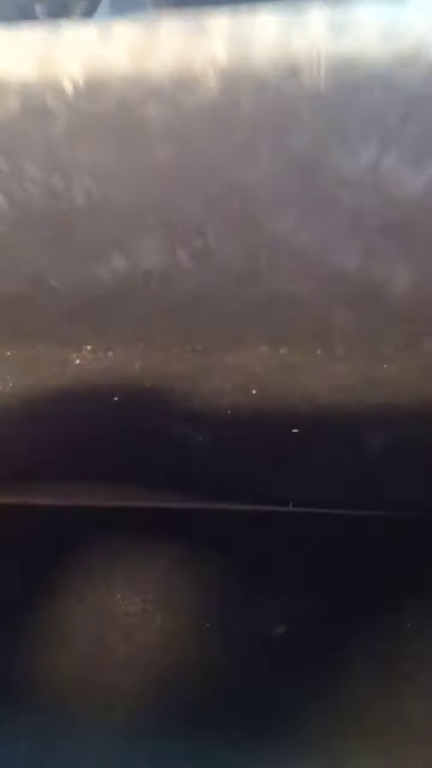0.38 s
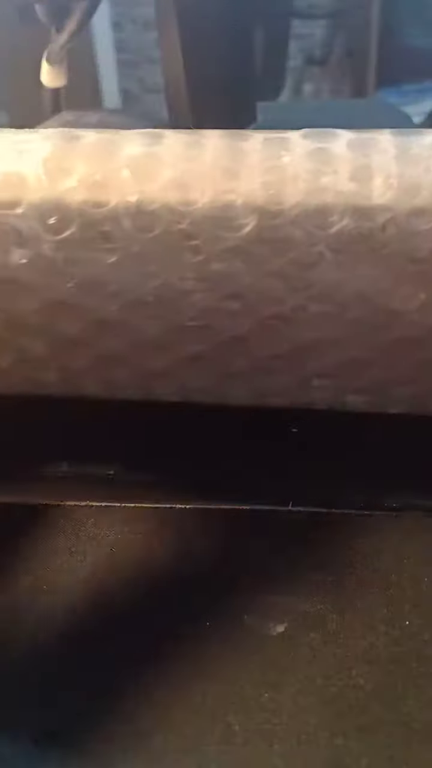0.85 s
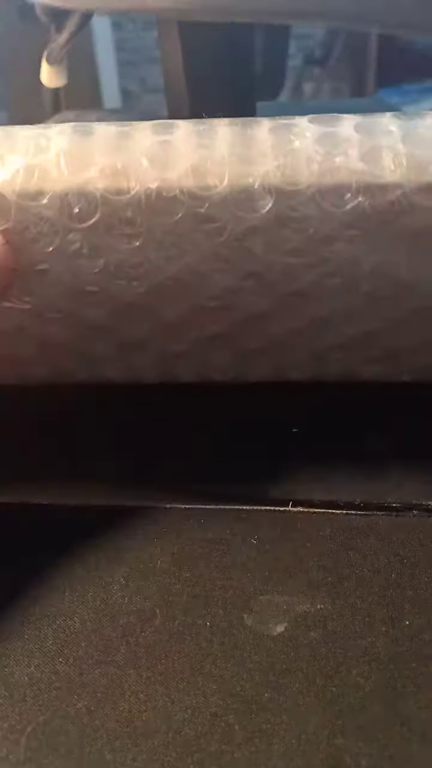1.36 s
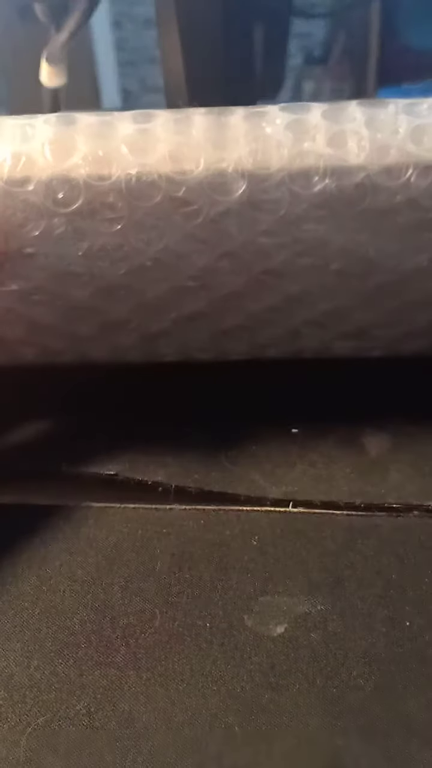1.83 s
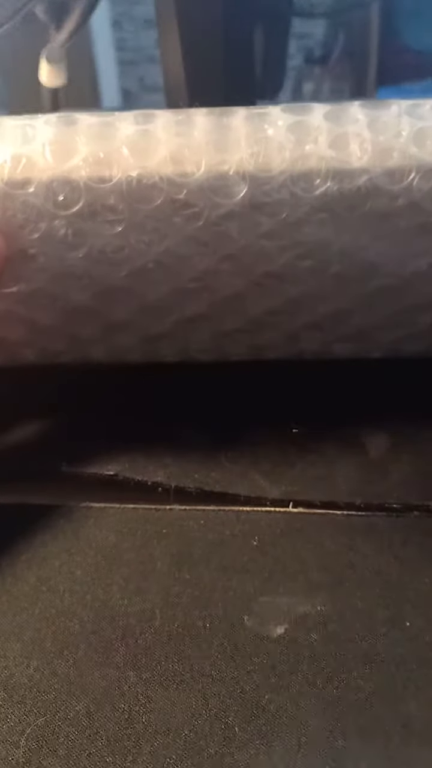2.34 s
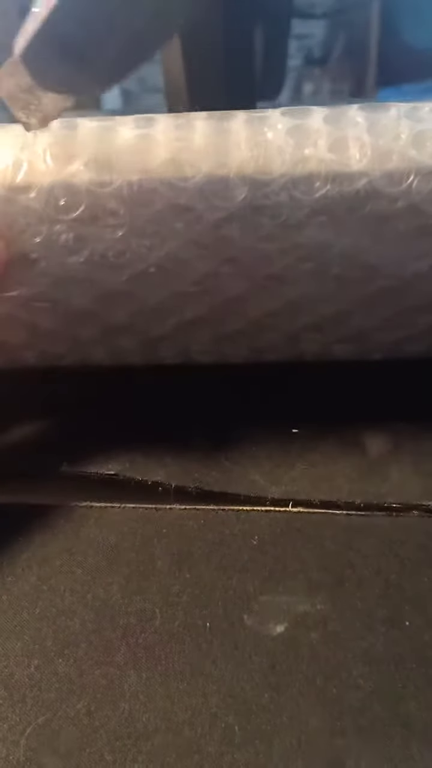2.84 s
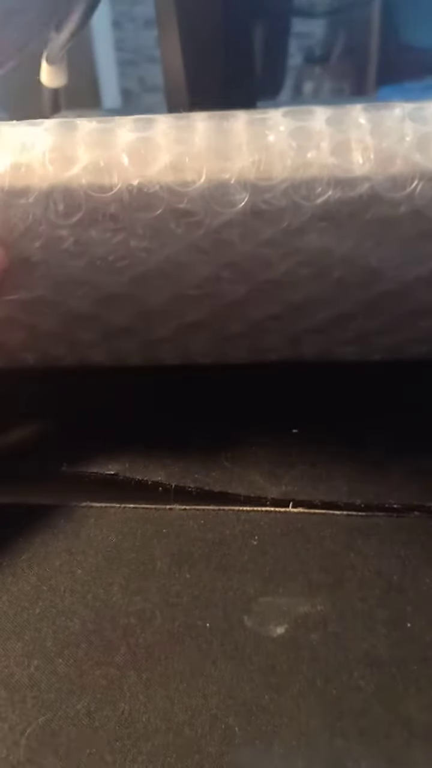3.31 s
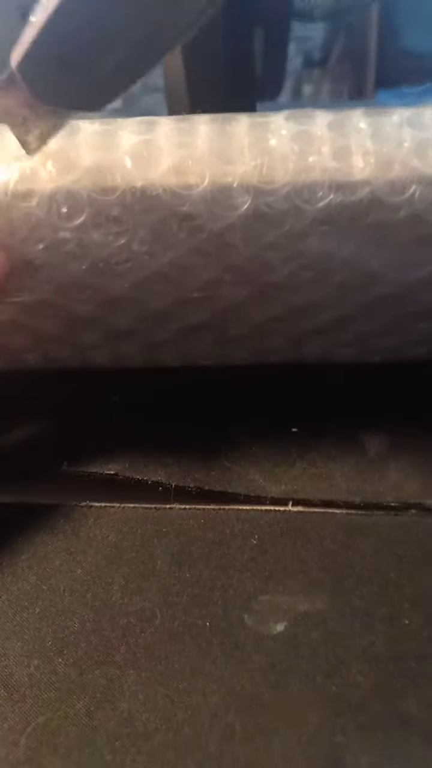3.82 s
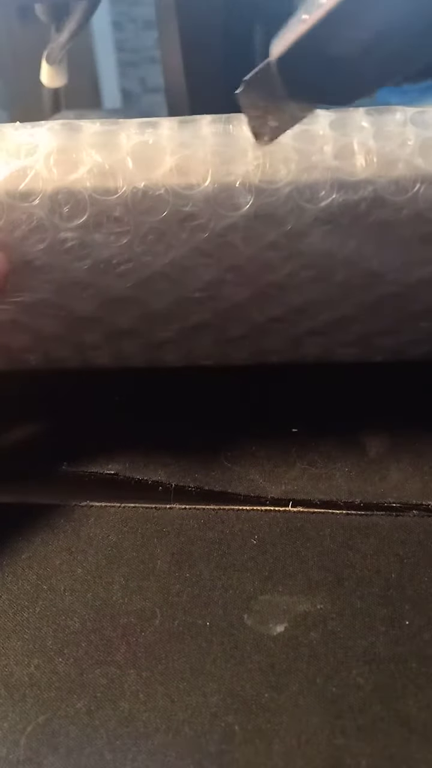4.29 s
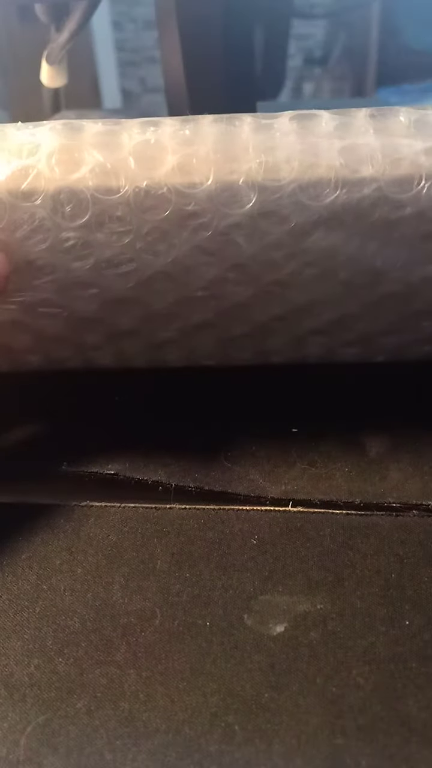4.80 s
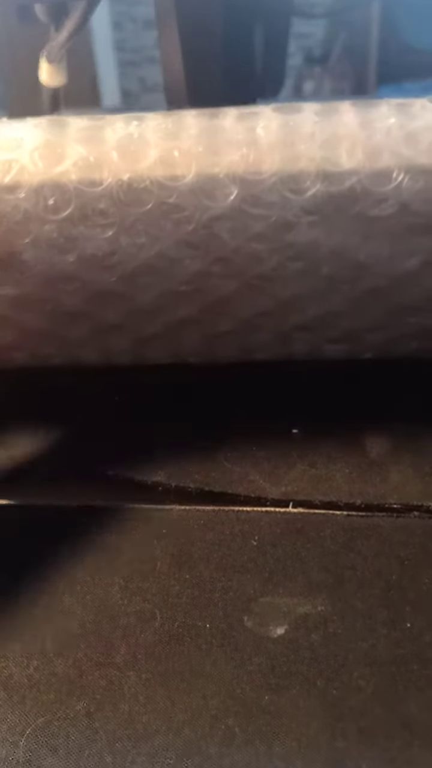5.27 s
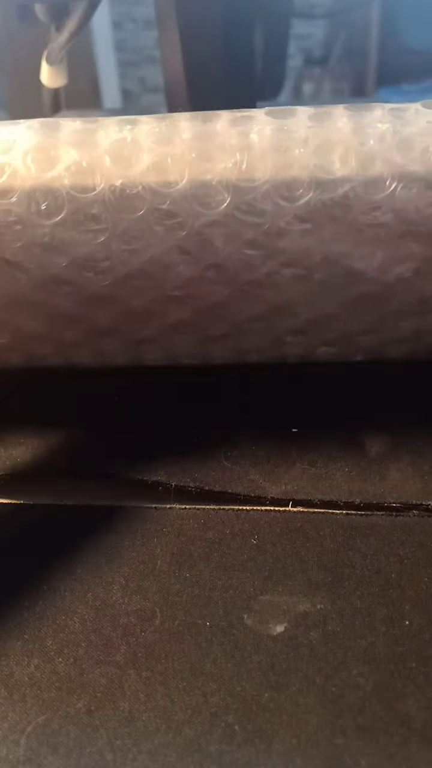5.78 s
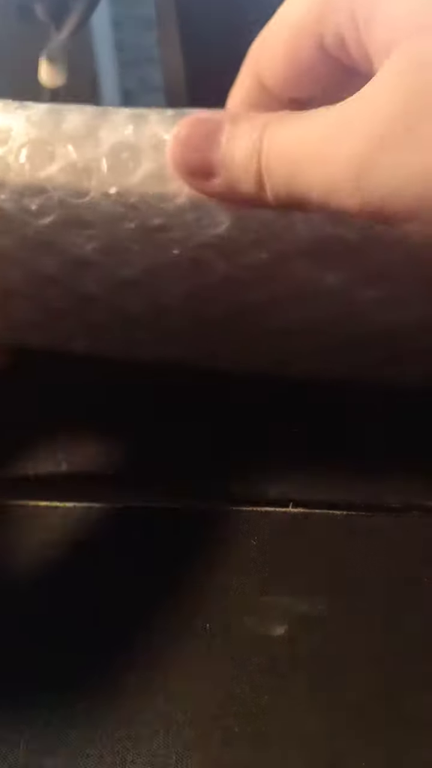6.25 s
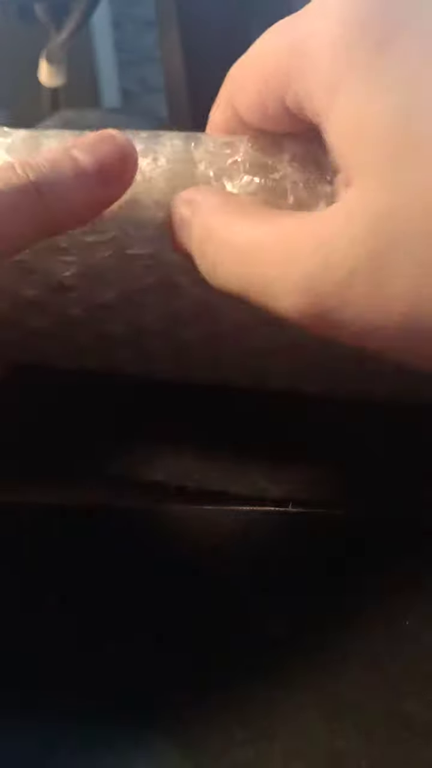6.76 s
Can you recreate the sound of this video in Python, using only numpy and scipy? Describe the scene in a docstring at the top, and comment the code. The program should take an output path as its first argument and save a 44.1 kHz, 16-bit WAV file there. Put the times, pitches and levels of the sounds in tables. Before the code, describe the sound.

Close plastic film crinkles, sharp ratchet clicks, crowded popping cuts into tape, a clattering drop on the table, then renewed rustling over room hum.

```python
"""Hands turn a bubble-wrapped parcel close to a two-port phone microphone: film rustles (dense ticks and
hiss) and snaps (short noise bursts). A knife slider then clicks from notch to notch. Sawing through tape
and film brings crowded, strong snaps, until the blade springs free with a damped metallic ring. The knife
bounces on the table, ringing and thudding, and the wrap is squeezed. Throughout, a small motor's
overtones hum in shaped room noise, which swells during the sawing."""
import sys
import numpy as np
from scipy import signal
from scipy.fft import rfft, irfft, next_fast_len
from scipy.io import wavfile
from scipy.ndimage import uniform_filter1d

SR = 44100
rng = np.random.default_rng(int(sys.argv[2]) if len(sys.argv) > 2 else 0)


def output_pcm(signal):
    """Save a mono or channel-first signal as 16-bit PCM at the path in sys.argv[1].

    Samples are clipped to [-1, 1] before scaling.
    """
    pcm = np.clip(np.atleast_2d(signal).T, -1, 1) * 32767
    wavfile.write(sys.argv[1], SR, np.round(pcm).astype(np.int16))


def gain_from_decibels(decibels):
    """Convert decibel values to linear amplitude factors."""
    exponent = np.asarray(decibels, float) / 20
    return 10 ** exponent


N = 303408  # samples

# Impact tables have the columns t/s, level/dB of the flexing patch, patch f/Hz,
# thump level/dB relative to the patch, burst decay/ms.
# Creases, air cells and tape letting go
SNAPS = [(0.0225, -35.5, 2170, -11, 0.69), (0.1406, -47, 4700, -6, 0.81), (0.2992, -38.5, 4830, -29, 0.66),
         (0.3537, -41, 4800, -31.5, 4.3), (0.5185, -43.5, 2630, -18.5, 0.57),
         (0.5405, -28, 5860, -15.5, 1.9), (0.591, -37.5, 1390, -15, 3.7), (0.71, -46.5, 1500, -20, 1.4),
         (0.77, -36, 4250, -31, 7.6), (0.7795, -43, 2820, -27, 5), (0.8388, -28.5, 2080, -7, 0.87),
         (0.9006, -44.5, 4980, -3, 1.5), (0.9382, -34, 1830, -2.5, 1.9), (1.085, -46, 5200, -17, .8),
         (2.389, -48, 4940, -20, .5), (2.4655, -43, 4400, -8, 0.36), (2.6591, -29, 2560, -34, 0.52),
         (2.676, -42, 4750, -12, .6), (2.7693, -45.5, 4470, -10, 0.57), (2.8189, -41.5, 4730, -12, 0.61),
         (2.9003, -37, 2030, -3, 1.7), (3.609, -37.5, 4380, -23, 0.9), (3.6394, -38.5, 4700, -14, 2.4),
         (3.6905, -34, 3360, -8, 0.21), (3.6994, -38.5, 2870, 4, 3.7), (3.711, -34.5, 2000, -6, 3.5),
         (3.7189, -42, 1430, 1.5, 2.3), (3.7342, -36, 2900, 0, .87), (3.7402, -37, 2800, -1, 1.4),
         (3.7746, -40, 4730, -9, 2.1), (3.7833, -38, 5060, -7, 2.7), (3.8586, -23, 2870, -6, 1.7),
         (3.8605, -17, 4830, -12, 0.61), (3.8757, -33, 5000, -17, 4.9), (3.8937, -36.5, 2460, 1, 2),
         (3.962, -40.5, 2010, -5, 0.76), (3.9692, -30, 2000, -8, 1.8), (3.992, -38.5, 1980, -5.5, 8.8),
         (4.0779, -39.5, 1920, -14, 2.6), (4.137, -31, 4670, -2.5, 1.7), (4.1517, -30, 3370, -17, 3.6),
         (4.1585, -20.5, 1870, -12.5, 0.79), (4.2048, -31, 1980, -24, 3.8), (4.2078, -28.5, 2030, -10, 3),
         (4.2303, -35.5, 2070, -16, 7.3), (4.2447, -30, 2030, -10, 7.2), (4.2482, -25.5, 5200, -21, .52),
         (4.2578, -29.5, 2540, -21, 1), (4.2699, -27.5, 5370, -31, .39), (4.319, -26.5, 4920, -19, 0.59),
         (4.3236, -24, 4590, -10, .52), (4.3303, -19, 5350, -9.5, 1.5), (4.3693, -27, 1890, -8.5, 1.3),
         (4.4207, -36, 1950, -6, 4.2), (4.471, -38, 3360, -8, 0.84), (4.4907, -34, 5100, -9, .65),
         (4.5285, -33, 4530, -2, 7.3), (4.5562, -32.5, 2700, -21, 3.9), (4.568, -30.5, 5230, -7, 5.2),
         (4.5735, -28, 5440, -25, 2.4), (4.6082, -37.5, 4200, -3, .92), (4.6289, -24.5, 2870, -34, .42),
         (4.6673, -14.5, 4400, -4.5, 0.44), (4.681, -31.5, 4700, -18, 1.4), (4.7052, -27, 2020, -24, 2.4),
         (4.751, -18, 1600, -3, 0.47), (4.7551, -19.5, 2020, -22, 1.3), (4.7686, -34.5, 1930, -12, 1.5),
         (4.7796, -29, 4700, -2, 0.81), (4.8214, -27.5, 4650, -11, 0.99), (4.8279, -22, 1920, -10.5, 7.2),
         (4.835, -29, 1970, -4, .7), (4.841, -25.5, 2000, -22, 2.4), (4.8622, -33, 2530, -17, 2),
         (4.8738, -24.5, 1840, -12.5, 0.41), (4.8772, -29.5, 4900, -17, 2.2),
         (4.9251, -32.5, 4900, -34, 0.51), (4.9486, -23, 1820, -9.5, 1), (4.953, -25.5, 4230, -5.5, 2.1),
         (4.9591, -24.5, 1780, -25, .54), (4.9857, -28.5, 2800, -21, 0.24), (5.0053, -24, 2780, -3.5, 2.1),
         (5.0096, -20.5, 2750, -7, 0.33), (5.0203, -22.5, 1600, -11, 8), (5.0334, -19, 4750, -5.5, 1.4),
         (5.0405, -18.5, 4400, -7.5, 2), (5.074, -31.5, 4260, -3, 3), (5.0996, -33.5, 4740, -3, 3.9),
         (5.1253, -22, 1760, -6, 1), (5.1353, -35, 1750, 6, .86), (5.1477, -12.5, 1900, -13, 0.52),
         (5.153, -15, 3030, -4, 2.7), (5.3086, -34.5, 5200, -24, .45), (5.3234, -41, 1390, -4, 1.8),
         (5.3752, -43, 2420, -17, 0.52), (5.406, -28.5, 3160, -30, 4.9), (5.4935, -35.5, 3940, -24, 0.17),
         (6.214, -46, 5800, -22, 1), (6.431, -34.5, 2340, -4, 1.5), (6.6093, -39, 4730, -12, .61),
         (6.6723, -38, 4700, -21.5, 2.7), (6.7452, -39.5, 4900, -9, .92), (6.7765, -34, 5500, -17, 0.22)]
# The knife slider snapping into its notches
SLIDER_CLICKS = [(1.439, -15, 5060, -24, 0.82), (1.5277, -17, 2880, -24.5, 1.2),
                 (1.7143, -15.5, 4070, -19, 2.45), (1.9082, -17, 2480, -14, 2.5),
                 (1.9492, -17.5, 4280, -39, 1.5)]
# The blade springing free of the tape
TWANG = [(5.1581, -22, 4925, -5.5, 4)]
# The knife bouncing on the table
KNOCKS = [(5.6935, -34, 2520, -26, 0.55), (5.6968, -22.5, 3000, -23, 3), (5.7013, -23, 4950, -16, 9.5),
          (5.7411, -10, 3000, -10.5, 2.1), (5.7517, -27.5, 4890, -10, 15), (5.7616, -13.5, 5300, -18.5, 11),
          (5.7716, -26.5, 3000, -18, 15), (5.8263, -17, 2820, -11.5, 3.5), (5.8423, -27.5, 2680, -7, 3.4),
          (5.8969, -39.5, 3000, -0.5, 4.3)]
# Resonances of the blade: f/Hz, level/dB relative to one another, t60/s
BLADE_MODES = [(2560, -15, 0.13), (3000, -11, 0.093), (4420, -26, 0.033), (4925, 1, 0.049),
               (5060, -3.5, 0.047)]
# Spectral colour of the near sounds: f/Hz, relative level/dB per Hz
NEAR_COLOUR = [(820, -36.5), (1400, -12.5), (1690, -3.5), (2320, 2.5), (2570, 4.5), (3510, -4.5), (4930, 1),
               (5760, -5.5), (7150, -15), (9550, -25), (11500, -22.5), (12600, -20.5), (13700, -17.5),
               (15500, -18.5), (16500, -35.5)]
# How busily the fingers work the film: t/s, rustle level/dB
HANDLING = [(0, -58.5), (.1, -65), (.22, -52.5), (.5, -56.5), (.7, -62), (.87, -56), (1.1, -60), (1.4, -62),
            (2.1, -72), (2.45, -69.5), (3.07, -58.5), (3.12, -75), (3.38, -74), (3.45, -62), (3.58, -63),
            (3.72, -56), (4.07, -57.5), (4.25, -49.5), (4.42, -58), (4.56, -51.5), (4.64, -58.5),
            (4.8, -50.5), (4.91, -57), (5.08, -47), (5.3, -62.5), (6.22, -63.5), (6.28, -52.5),
            (6.4, -48.5), (6.48, -54), (6.62, -49.5), (6.7, -55), (6.78, -50), (6.88, -52.5)]
# Spectrum of the room noise (f/Hz, relative level/dB per Hz), and its total level/dB before the swell
AIR, AIR_DB = [(15, -55), (30, -18), (55, -2.5), (82, 0), (100, -20), (120, -2), (150, -5), (160, -24),
               (200, -1.5), (440, -3.5), (540, -8), (700, -9.5), (900, -8), (1430, -14), (2000, -18.5),
               (2700, -18.5), (3500, -28), (4800, -22), (6000, -39), (7500, -40.5), (16500, -44)], -56.5
# Low peaks in the hum: room modes, and at 174.8 Hz the motor's third overtone: f/Hz, width/Hz, level/dB before
# the swell
LOW_PEAKS = [(69.9, 14, -65.5), (174.8, 12, -65), (240.7, 8.2, -61), (361.6, 8.2, -72.5), (420, 33.6, -63),
             (613.3, 6.4, -70.5)]
# Overtones of the motor: multiple of MOTOR_HZ, level/dB before the swell
MOTOR = [(9, -78), (16, -80), (17, -80), (18, -85), (20, -82), (21, -84), (22, -85)]
# Likeness of the room noise at the two ports: f/Hz, likeness (0-1)
LIKENESS = [(60, 0.9), (290, 0.87), (640, 0.5), (1400, .05), (16000, 0)]
# Growth of the hum: t/s, level/dB (taken relative to its median)
ROOM_SWELL = [(0, -61.5), (3.1, -61.5), (3.95, -61), (4.9, -56.5), (6.88, -56)]

MOTOR_HZ = 58.0
PORT_OFFSET_S = 0.00028
# Each snap stirs the film around it, the harder the more; level relative to the snap
STIR_DB, STIR_RISE_S, STIR_FALL_S = -30, 0.0068, 0.035
# Lesser snaps: least level over the rustle, mean excess, mean thump, middle decay
SMALL_DB, SMALL_SPREAD_DB, SMALL_THUMP_DB, SMALL_MS = 2.5, 2.5, -4.5, 0.86
# Just before a click the slider scrapes up the notch: lead, relative level, pitch, ratio of decays
CLIMB_MS, CLIMB_DB, CLIMB_HZ, CLIMB_LONGER = 2.6, -18, 3000, 3
# Stronger impacts carry less treble for their size, with random scatter
DULLER_DB_PER_DB, TREBLE_SCATTER_DB = 0.299, 2.5
SLIDER_RING_DB, BOUNCE_RING_DB = -52, -33


def wrap(count=45):
    """Impulsive buckling: film and tape snap, with lesser snaps likelier where the film moves more."""
    level = sum(handling())
    when, size, pitch, thump, length = rng.random((count, 5)).T
    # draw times in proportion to the rustle amplitude
    i = np.searchsorted(np.cumsum(level) / level.sum(), np.clip(when, 0.01, 0.99))
    excess_db = SMALL_DB - SMALL_SPREAD_DB * np.log(1 - size)
    small = np.transpose([
        i / SR,
        20 * np.log10(level[i]) + excess_db,
        1700 * 3.0 ** pitch,
        SMALL_THUMP_DB + 14 * (thump - 0.5),
        SMALL_MS * 3.8 ** (length - 0.5),
    ])
    # the air cells boom near 800 Hz
    return impacts([*SNAPS, *small], thump_hz=(650, 1000), treble_db=-22, pan_db=-3, alike=0.5,
                   rise=0.37, ring_db=-np.inf)


def knife():
    """Damped free vibration: slider clicks are nearly dry; out of the hand the blade rings, the table thuds."""
    climbs = [(s - CLIMB_MS / 1000, db + CLIMB_DB, CLIMB_HZ, thump, ms * CLIMB_LONGER)
              for s, db, _, thump, ms in SLIDER_CLICKS]
    clicks = impacts(SLIDER_CLICKS + climbs, thump_hz=(120, 1350), treble_db=-6.5, pan_db=-3.5, alike=0.53,
                     rise=0.35, ring_db=SLIDER_RING_DB, broad_db=0.5, crack=1.5)
    twang = impacts(TWANG, thump_hz=(300, 900), treble_db=-16, pan_db=-8, alike=0.2,
                    rise=1.0, ring_db=-12, crack=0)
    bounces = impacts(KNOCKS, thump_hz=(140, 400), treble_db=-15.5, pan_db=-2.5, alike=0.39,
                      rise=0.59, ring_db=BOUNCE_RING_DB, crack=0.24)
    return clicks + twang + bounces


def impacts(rows, thump_hz, treble_db, pan_db, alike, rise, ring_db, broad_db=-3, spread=1.118, crack=1.9,
            size=4096):
    """Stick-slip excitation: a brief burst of slips excites a patch, a thumping hollow and the blade's modes."""
    out = np.zeros((2, N + size))
    t = np.arange(size) / SR
    ring = sum(gain_from_decibels(db) * np.sin(2 * np.pi * hz * t) * 1000.0 ** (-t / t60) for hz, db, t60 in BLADE_MODES)
    response = causal(NEAR_COLOUR, size) + gain_from_decibels(ring_db) * rfft(ring)
    strongest_db = max(row[1] for row in rows)
    lead = 0.004  # s from the start of the block to the main slip
    for s, level_db, patch_hz, thump_db, decay_ms in rows:
        decay = np.clip(decay_ms, 0.15, 20) / 1000
        envelope = np.exp(-np.abs(t - lead) / np.where(t < lead, rise * decay, decay))
        # the main slip is a hard crack
        envelope = envelope * (1 + crack * np.exp(-np.abs(t - lead) / 0.00014))
        # the envelope comes later at the left port
        left_envelope = np.roll(envelope, round(PORT_OFFSET_S * SR))
        burst = ports((size,), alike) * np.array([left_envelope, envelope])
        bright = irfft(rfft(burst) * response)

        thump = band(burst.mean(0), *thump_hz, order=1)
        patch = band(bright, patch_hz / spread, patch_hz * spread, order=1)
        middle = band(bright, 1400, 7500)
        treble = band(bright, 7500, 16500)
        dulling_db = DULLER_DB_PER_DB * (level_db - strongest_db)
        this_treble_db = treble_db - dulling_db + TREBLE_SCATTER_DB * rng.standard_normal()

        parts = (thump_db, thump), (0, patch), (broad_db, middle), (this_treble_db, treble)
        y = 0
        for db, part in parts:
            # greatest short-time power, over 25 samples
            peak_power = uniform_filter1d(part ** 2, size=25).max(-1, keepdims=True)
            y = y + gain_from_decibels(db) * part / np.sqrt(peak_power)
        i = int((s - lead) * SR)
        out[:, i:i + size] += pan(y * gain_from_decibels(level_db), pan_db)
    return out[:, :N]


def rustle(per_s=600, spread_db=2.5, smear_ms=1.6, rub_db=-5.5, cells_db=-10, pan_db=-4,
           finger_treble_db=-15, stir_treble_db=-22):
    """Random-impulse (shot) noise: countless unequal tiny creases over the smoother hiss of skin on film."""
    fingers, stirred = handling()
    sizes = gain_from_decibels(spread_db * np.minimum(rng.exponential(size=N), 3))
    ticks = (rng.random(N) < per_s / SR) * sizes
    ticks = signal.lfilter([1], [1, -np.exp(-1000 / (smear_ms * SR))], ticks)
    noise = ports((N,), 0.17) * (ticks / rms(ticks) + gain_from_decibels(rub_db))
    size = next_fast_len(N)
    bright = irfft(rfft(noise, size) * causal(NEAR_COLOUR, size), size)[:, :N]

    cells = band(noise, 600, 1200, order=1)
    middle = band(bright, 1400, 7500)
    treble = band(bright, 7500, 16500)
    body = gain_from_decibels(cells_db) * cells / rms(cells) + middle / rms(middle)
    treble_level = gain_from_decibels(finger_treble_db) * fingers + gain_from_decibels(stir_treble_db) * stirred
    return pan(body * (fingers + stirred) + treble / rms(treble) * treble_level, pan_db)


def handling():
    """Amplitude modulation: rustle amplitude from the fingers alone, and from film stirred around each snap."""
    snaps = np.array(SNAPS)
    kicks = np.zeros(N)
    kicks[(snaps[:, 0] * SR).astype(int)] = gain_from_decibels(snaps[:, 1] + STIR_DB)
    t = np.arange(-SR // 4, SR // 4 + 1) / SR
    swell = np.exp(-np.abs(t) / np.where(t < 0, STIR_RISE_S, STIR_FALL_S))
    fingers = gain_from_decibels(curve(HANDLING, np.arange(N) / SR)[0])
    return fingers, np.abs(signal.fftconvolve(kicks, swell, "same"))


def room(dry, wet_db=-17.0, t60_s=0.34, treble_t60_s=0.27, near_db=-11, near_t60_s=0.041,
         bounce_s=0.0078, bounce_db=-20):
    """Reverberation: table and parcel scatter at once, a wall returns a smeared echo, a diffuse tail decays."""
    t = np.arange(SR // 2) / SR
    low, high, near, echo = rng.standard_normal((4, 2, len(t)))
    tail = band(low, 60, 6500) * 1000.0 ** (-t / t60_s)
    tail += band(high, 6500, 17000) * 1000.0 ** (-t / treble_t60_s)
    tail *= 1 - np.exp(-t / 0.003)  # gradual onset
    near = near * 1000.0 ** (-t / near_t60_s)
    echo = echo * np.exp(-((t - bounce_s) / 0.0023) ** 2)
    paths = (wet_db, tail), (near_db, near), (bounce_db, echo)
    # each path has unit energy before its level is applied
    response = sum(gain_from_decibels(db) * h / np.sqrt((h ** 2).sum(1, keepdims=True)) for db, h in paths)
    return dry + signal.fftconvolve(dry, response, axes=1)[:, :N]


def hum(pan_db=-2.5, drift_hz=4.8):
    """Superposition of powers: room noise, its low peaks and motor overtones, shared by the ports in the bass."""
    hz = np.arange(N // 2 + 1) * SR / N
    air = gain_from_decibels(curve(AIR, hz, True)[0])
    power = gain_from_decibels(2 * AIR_DB) * air ** 2 / np.sum(air ** 2)
    overtones = [(multiple * MOTOR_HZ, drift_hz, db) for multiple, db in MOTOR]
    for f, width, db in LOW_PEAKS + overtones:
        bell = np.exp(-0.5 * ((hz - f) / (width / 2)) ** 2)
        power = power + gain_from_decibels(2 * db) * bell / bell.sum()

    # sum and difference of the ports carry the shared and the unshared power
    alike = np.clip(curve(LIKENESS, hz, True)[0], 0, 1)
    spectra = rfft(rng.standard_normal((2, N)))
    mid, side = spectra * np.sqrt(power * N / 4 * np.array([1 + alike, 1 - alike]))
    both = np.array([mid + side, mid - side])
    # the deepest boom takes no part in the swell
    upper = irfft(both * (hz >= 100), N)
    boom = irfft(both * (hz < 100), N)
    swell_db = curve(ROOM_SWELL, np.arange(N) / SR)[0]
    return pan(upper * gain_from_decibels(swell_db - np.median(swell_db)) + boom, pan_db)


def ports(shape, alike):
    """Partial coherence: noise at two ports, partly shared, the shared part earlier in the left one."""
    a, b = rng.standard_normal((2, *shape))
    alike = np.clip(alike, 0, 1)
    left = alike * a + np.sqrt(1 - alike ** 2) * b
    return np.array([np.roll(left, -round(PORT_OFFSET_S * SR), -1), a])


def pan(x, left_over_right_db):
    """Interaural-style level difference, split evenly between the two ports."""
    return x * gain_from_decibels(np.array([[left_over_right_db], [-left_over_right_db]]) / 2)


def curve(table, at, log=False):
    """Linear interpolation of a table's columns along its first, on a logarithmic axis if asked."""
    x, *columns = np.transpose(table)
    axis = (lambda v: np.log(np.maximum(v, 1))) if log else (lambda v: v)
    return np.array([np.interp(axis(at), axis(x), c) for c in columns])


def causal(table, size):
    """Minimum phase: frequency response of an (f/Hz, level/dB) colour by folding its cepstrum."""
    hz = np.arange(size // 2 + 1) * SR / size
    cepstrum = irfft(np.log(gain_from_decibels(curve(table, hz, True)[0])))
    cepstrum[1:size // 2] *= 2
    cepstrum[size // 2 + 1:] = 0
    return np.exp(rfft(cepstrum))


def band(x, low_hz, high_hz, order=4):
    """Butterworth band-pass filtering."""
    return signal.sosfilt(signal.butter(order, [low_hz, high_hz], "band", fs=SR, output="sos"), x)


def rms(x):
    """Effective value: root mean square."""
    return np.sqrt(np.mean(x ** 2))


def scene():
    """Linear superposition: near sources reverberate in the room, over its hum."""
    return room(wrap() + knife() + rustle()) + hum()


def low_pass(x):
    """Removes everything above the highest recorded frequency."""
    return signal.sosfilt(signal.butter(12, 16650, fs=SR, output="sos"), x)


def record(dry):
    """Saturation: the input rounds the loudest peaks and has a small constant offset."""
    rounded = 0.85 * np.tanh(dry / 0.85) + 0.0007
    return low_pass(rounded)


dry = scene()
out = record(dry)
output_pcm(out)
```